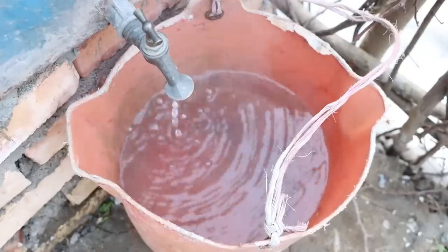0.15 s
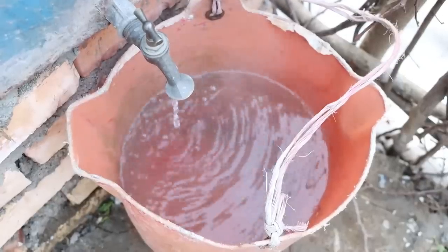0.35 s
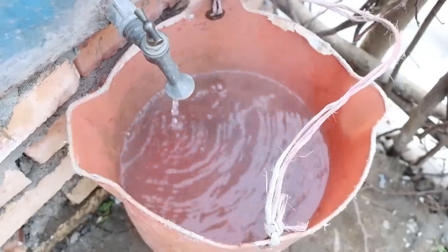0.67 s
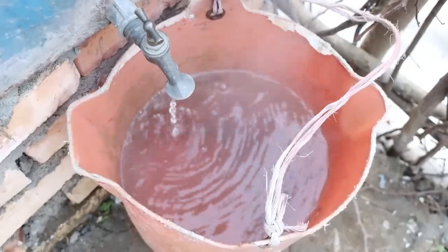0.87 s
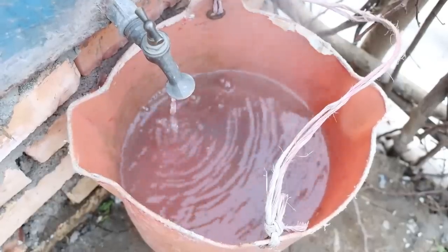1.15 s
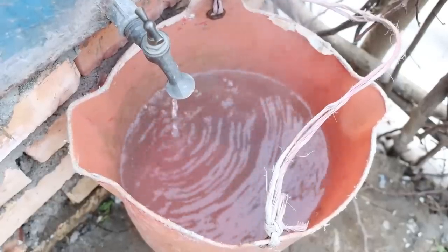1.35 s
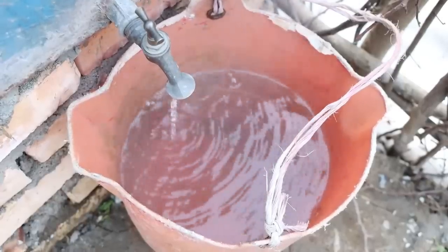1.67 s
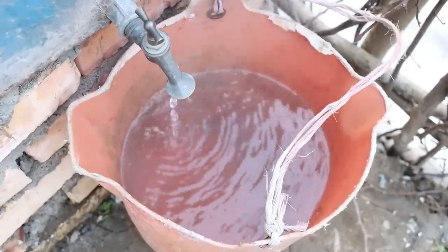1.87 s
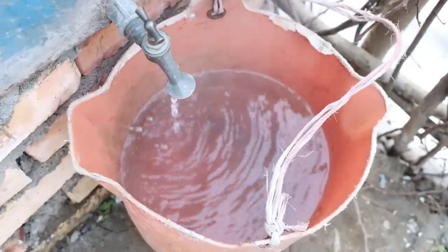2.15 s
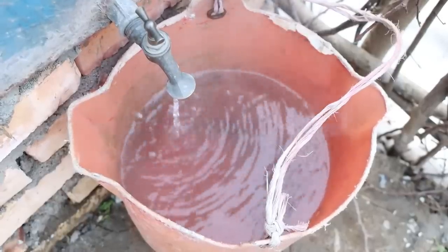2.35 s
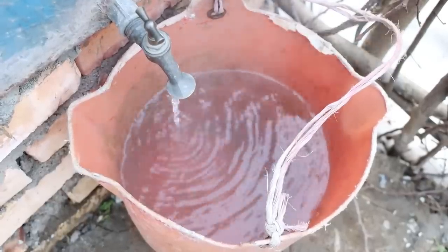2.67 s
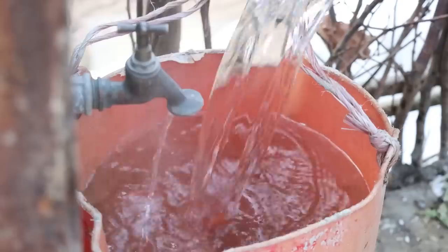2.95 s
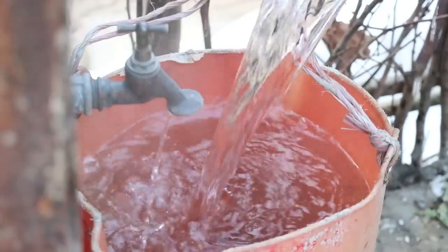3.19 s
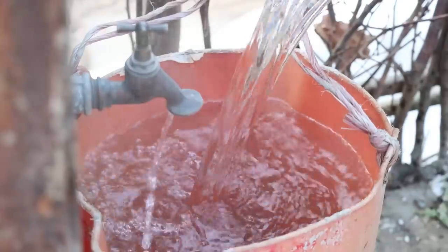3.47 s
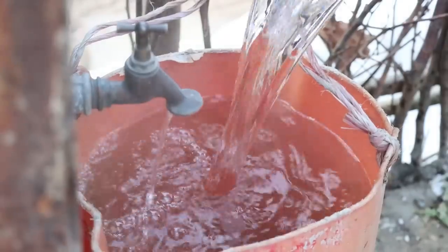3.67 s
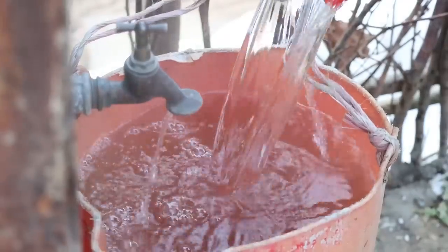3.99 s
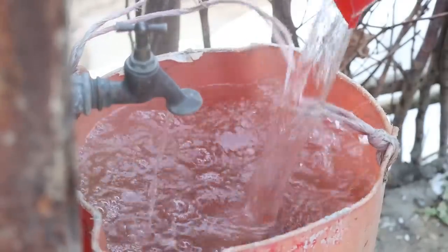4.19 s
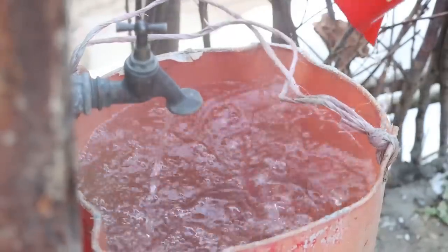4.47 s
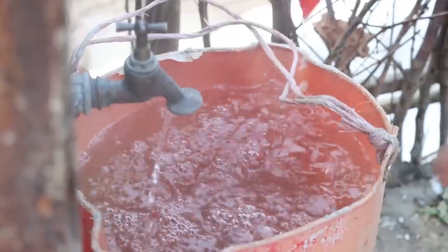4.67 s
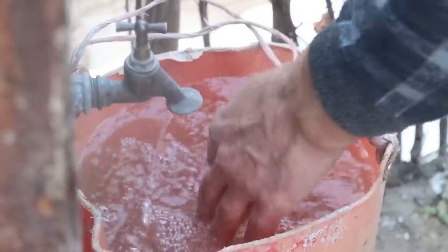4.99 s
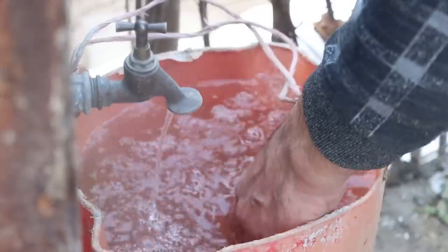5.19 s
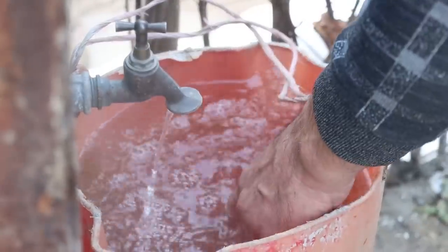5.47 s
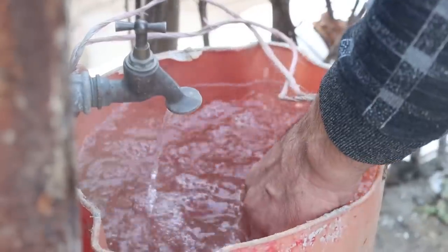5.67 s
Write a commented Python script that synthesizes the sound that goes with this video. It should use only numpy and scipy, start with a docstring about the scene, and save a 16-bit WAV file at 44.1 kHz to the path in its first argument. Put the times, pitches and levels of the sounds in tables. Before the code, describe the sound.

A broken trickle patters into a nearly full bucket in a yard, each drop a sharp tick coloured by the hollow plastic. The sound then switches abruptly to poured water, surging, easing and surging again with splashes, gurgles and fizzing droplets. It ends in soft, sparse dripping and light bubbling, as a hand moves in the water. Close stereo microphone, slightly left, very quiet low background.

```python
"""Outdoor tap: a thin stream breaks into drops that fall into a nearly full plastic bucket.
Each drop is a noise slap, coloured by the air in the bucket; trapped bubbles are short gliding sines, most rising.
From 2.79 to 4.5 s a jug is emptied in two gushes of dense small bubbles and clicking spray.
Then the trickle goes on, farther off and weaker, while a hand stirs; the yard hums behind as banded noise."""
import sys
import numpy as np
from scipy import signal
from scipy.io import wavfile

SR = 44100
rng = np.random.default_rng(int(sys.argv[2]) if len(sys.argv) > 2 else 0)


def store_pcm(level_fs):
    """Save levels as 16-bit WAV."""
    pcm = np.round(np.clip(level_fs, -1, 1) * 32767).astype(np.int16)
    wavfile.write(sys.argv[1], SR, np.atleast_2d(pcm).T)


N = 257103


def from_db(db):
    """Decibels to amplitude gain."""
    return 10 ** (np.asarray(db) / 20)


def rms_one(x):
    """Scales to rms 1."""
    return x / np.sqrt(np.mean(x ** 2) + 1e-20)


def in_time(rows):
    """Interpolates the columns of a (time, ...) table to one value a sample."""
    time_s, *columns = np.transpose(rows)
    return [np.interp(np.arange(N) / SR, time_s, column) for column in columns]


def at_hz(points, hz):
    """Reads a (frequency, value) table on a log frequency axis."""
    points_hz, values = np.array(points).T
    return np.interp(np.log(hz), np.log(points_hz + 1), values)


def drift(corner_hz):
    """Slow random curve of rms 1: noise through two equal one-pole low-passes."""
    step = 20  # samples between computed points
    pole = np.exp(-2 * np.pi * corner_hz * step / SR)
    noise = rng.standard_normal(N // step + 2002)
    slow = signal.lfilter([1], [1, -2 * pole, pole * pole], noise)[2000:]  # drop the run-in
    return np.interp(np.arange(N) / step, np.arange(len(slow)), rms_one(slow))


def resonance(x, hz, width_hz):
    """Two-pole resonance with peak gain 1."""
    r = np.exp(-np.pi * width_hz / SR)
    b = [(1 - r * r) / 2, 0, (r * r - 1) / 2]
    a = [1, -2 * r * np.cos(2 * np.pi * hz / SR), r * r]
    return signal.lfilter(b, a, x + 1e-18)


def shaped(x, peaks):
    """Chain of resonant peaks and dips."""
    for hz, width_hz, db in peaks:
        x = x + (from_db(db) - 1) * resonance(x, hz, width_hz)
    return x


def add(out, time_s, sound):
    """Mixes a short sound in at a time."""
    i = int(time_s * SR)
    out[..., i:i + sound.shape[-1]] += sound[..., :N - i]


def stereo_bands(mid, side, spectrum, flicker_db):
    """Third-octave bands, each with its own level, flicker, left-right correlation and lean."""
    # left-right correlation: (frequency [Hz], correlation [0-1])
    likeness = [(60, 1), (500, 0.75), (1200, 0.14), (2500, 0.25), (5000, 0.55), (12000, 0.087)]
    # left minus right: (frequency [Hz], level [dB])
    lean = [(60, 0.5), (1000, -0.5), (4000, 0.5), (12000, -0.5)]
    out = 0
    edges_hz = 22 * 2 ** (np.arange(30) / 3)
    for low_hz, high_hz in zip(edges_hz, edges_hz[1:]):
        hz = np.sqrt(low_hz * high_hz)
        if hz < spectrum[0][0]:
            continue
        band = signal.butter(2, [low_hz, high_hz], "band", fs=SR, output="sos")
        m, s = signal.sosfilt(band, [mid, side])
        alike = np.clip(at_hz(likeness, hz), -1, 1)
        level_db = at_hz(spectrum, hz) + flicker_db * drift(corner_hz=34.0)
        lean_db = at_hz(lean, hz) / 2 * np.array([[1], [-1]])
        stereo = np.sqrt(1 + alike) * m + np.sqrt(1 - alike) * s * [[1], [-1]]
        out = out + from_db(level_db + lean_db) * stereo
    return out


def slaps():
    """A drop hits the water: a noise crack with a decaying tail, a bright part and a part ringing the bucket air."""
    # loud drops: (time [s], relative crack [dB], relative air ring [dB], brightest [Hz])
    loud_drops = [(0.0024, -23, -28, 4600), (0.0637, -29, -26, 5120), (0.1002, -44, -35, 4500),
                  (0.1286, -15.5, -28, 4530), (0.1848, -36, -53, 7590), (0.2563, -23, -33.5, 4590),
                  (0.2754, -42, -31, 4600), (0.285, -29, -34, 6030), (0.312, -25, -53, 4600),
                  (0.338, -22.5, -31, 5000), (0.376, -22, -24, 4570), (0.3894, -16, -40, 4610),
                  (0.412, -18.5, -25, 4570), (0.4449, -23.5, -30, 5610), (0.4829, -13.5, -23, 5600),
                  (0.5084, -23, -23.5, 5560), (0.5126, -12, -19, 5900), (0.5393, -17.5, -48, 7600),
                  (0.5736, -18.5, -31, 11300), (0.61, -20, -27, 4800), (0.6371, -28, -29, 5000),
                  (0.6608, -29.5, -34, 11700), (0.6784, -34, -22.5, 11600), (0.697, -16, -23.5, 4800),
                  (0.7178, -31, -51, 10800), (0.769, -31, -35, 8960), (0.8051, -25, -27.5, 4640),
                  (0.8754, -33, -35.5, 9630), (0.8899, -25.5, -59, 7700), (0.9147, -27, -61, 11500),
                  (0.9395, -18.5, -53, 12200), (0.9554, -26, -31, 4620), (0.9842, -23.5, -24.5, 4620),
                  (1.0288, -33, -29, 11900), (1.044, -21, -30, 4600), (1.055, -20, -36, 4980),
                  (1.0761, -20.5, -33, 5500), (1.0887, -30, -35, 9090), (1.1255, -22.5, -32.5, 4610),
                  (1.1414, -31, -30, 4540), (1.1693, -29, -28, 5480), (1.2045, -42, -38, 4520),
                  (1.2306, -21, -37, 5640), (1.2615, -35, -36, 12800), (1.3017, -16.5, -23, 11700),
                  (1.3369, -36, -31, 4790), (1.349, -30, -33, 4600), (1.3733, -19, -32, 4760),
                  (1.4205, -33, -39, 12000), (1.4611, -28, -35, 7090), (1.4937, -26, -28, 4610),
                  (1.5145, -30, -36, 12000), (1.5288, -23.5, -26.5, 4660), (1.5565, -16.5, -24, 6500),
                  (1.5986, -22, -16, 4600), (1.6128, -21, -25.5, 4570), (1.6552, -30, -32, 4610),
                  (1.6761, -31, -36, 4970), (1.712, -34, -33, 5620), (1.7491, -17, -27, 4400),
                  (1.7672, -17, -28, 4240), (1.789, -29, -52, 9050), (1.8057, -39, -30, 4770),
                  (1.8182, -18.5, -24.5, 4340), (1.8515, -30.5, -37, 5610), (1.8846, -37, -33, 5520),
                  (1.92, -24, -38, 5580), (1.942, -18, -30, 11000), (1.9694, -23, -41, 5580),
                  (1.99, -21, -40, 4900), (2.0035, -16.5, -31.5, 5700), (2.0311, -21.5, -37, 5640),
                  (2.051, -28, -43, 12600), (2.0908, -20, -26.5, 4590), (2.1044, -17.5, -30, 4560),
                  (2.1266, -30, -41, 4870), (2.1727, -18, -38, 11600), (2.197, -26, -26, 4540),
                  (2.2136, -40, -40, 4520), (2.2404, -16.5, -36, 5760), (2.3022, -12.5, -34, 5800),
                  (2.3337, -31, -31, 4620), (2.3594, -17, -38, 7040), (2.4024, -40, -30.5, 4760),
                  (2.4165, -31, -37, 11600), (2.4343, -27.5, -27, 8960), (2.4558, -23, -27.5, 5630),
                  (2.5004, -19, -34.5, 6070), (2.5336, -8, -27, 4500), (2.5745, -16.5, -30.5, 11700),
                  (2.6045, -33, -39, 5270), (2.6284, -9, -19.5, 4700), (2.6695, -28, -34.5, 6790),
                  (2.703, -23.5, -27, 5560), (2.7284, -34, -30, 4720), (2.754, -21, -23, 4660),
                  (2.7758, -42, -39, 6980), (2.7937, -10.5, -26, 6950), (2.8087, -10, -25, 4630),
                  (2.836, -13, -41, 5050), (2.8483, -17.5, -40, 12600), (2.873, -24, -40, 5570),
                  (2.9221, -16.5, -21.5, 6690), (2.9865, -10.5, -22.5, 4520), (3.0334, -24, -27, 4600),
                  (3.052, -15, -26, 5040), (3.075, -34, -25, 6720), (3.1503, -10, -27, 4600),
                  (3.173, -25, -25, 4570), (3.1952, -33, -23, 4500), (3.2127, -24, -30, 6430),
                  (3.268, -16.5, -42, 7600), (3.2814, -33, -26.5, 4610), (3.292, -25, -33, 11600),
                  (3.3122, -22.5, -26, 5630), (3.3514, -28, -29, 5850), (3.3972, -28, -19, 4540),
                  (3.486, -23, -26.5, 4670), (3.502, -21.5, -28, 4970), (3.5668, -15.5, -29, 4500),
                  (3.6539, -28, -25.5, 4560), (3.7277, -16.5, -37.5, 5460), (3.7725, -37, -43, 5870),
                  (3.7954, -20, -28, 6660), (3.8516, -31, -33, 6340), (3.865, -26, -27.5, 4950),
                  (3.8836, -31, -47, 7350), (3.913, -25, -40, 7050), (3.9585, -11.5, -25.5, 5470),
                  (3.979, -21, -30, 9670), (4.018, -31, -31, 6780), (4.0667, -14.5, -52, 4500),
                  (4.0976, -22, -39, 4780), (4.121, -13.5, -28, 4640), (4.1505, -34, -36, 5480),
                  (4.1771, -18.5, -25.5, 6500), (4.2106, -14.5, -33, 6940), (4.288, -23, -36.5, 6770),
                  (4.3288, -8, -30, 4750), (4.359, -13, -36, 6400), (4.3805, -14.5, -26, 6960),
                  (4.4135, -19, -27, 4570), (4.436, -30, -22.5, 4570), (4.446, -14, -22.5, 4500),
                  (4.4835, -20, -43, 5460), (4.5016, -22, -42, 5600), (4.5503, -26.5, -49, 5450),
                  (4.6206, -30.5, -38, 11600), (4.6612, -30, -34, 4660), (4.7216, -23.5, -35, 7400),
                  (4.7646, -18, -43, 5300), (4.8738, -21.5, -38, 8900), (4.884, -21.5, -37, 11600),
                  (5.1163, -29, -38, 6590), (5.1612, -23, -35.5, 4790), (5.1838, -29, -49, 4800),
                  (5.206, -30, -38, 4670), (5.2818, -27.5, -33.5, 6900), (5.3477, -25, -34, 12400),
                  (5.3974, -31, -37.5, 6130), (5.4261, -27, -37, 11600), (5.4715, -28, -60, 7700),
                  (5.5213, -31, -56, 12300), (5.6196, -40, -42, 4530), (5.6444, -26.5, -41, 6700),
                  (5.752, -28.5, -59, 4630), (5.8107, -28, -36, 4650)]
    # resonances of the air in the bucket: (centre [Hz], width [Hz], relative level [dB])
    air_modes = [(477, 46.5, -7), (776, 140, -5.5), (1104, 186, 0), (1860, 500, -8.5), (2636, 488, -4),
                 (4710, 360, -11.5)]
    t = np.arange(int(.04 * SR)) / SR
    attack_s, crack_decay_s = 0.00035, 0.00034
    tail = from_db(-9 - 60 * t / 0.03)
    shape = np.minimum(t / attack_s, 1) * (np.exp(-t / crack_decay_s) + tail)

    body, bright = np.zeros(N), np.zeros((2, N))
    drops = np.vstack([loud_drops, drips()])
    noises = rng.standard_normal((len(drops), 3, len(t)))
    for (time_s, crack_db, ring_db, hz), noise in zip(drops, noises):
        add(body, time_s, from_db(ring_db) * shape * noise[0])
        burst = from_db(crack_db) * shape * noise[1:]
        add(bright, time_s, 0.24 * burst + resonance(burst, hz, width_hz=0.41 * hz))

    air = np.zeros(N)
    for k, (hz, width_hz, db) in enumerate(air_modes):
        air += (-1) ** k * from_db(db) * resonance(body, hz, width_hz)  # alternating polarity
    high_pass = signal.butter(2, 4500, "high", fs=SR, output="sos")
    mid, side = signal.sosfilt(high_pass, bright)
    crack = (mid + 0.72 * side * [[1], [-1]]) * from_db([[1.8], [-1.8]])
    # make-up gains: the resonances and the high-pass let through only part of each burst
    return from_db(24) * air + from_db(2.5) * crack


def drips():
    """Small drops at random moments, in rows like the loud ones; weaker after the move away."""
    drips_per_s, move_s = 16, 2.79
    near_db, far_db, ring_re_crack_db = -37, -41, -8
    spread_db = 2.5  # per e-fold of the random size
    lowest_hz, range_octaves = 4600, 1.5  # colour, mostly low in this range
    when, size, colour = rng.random((int(drips_per_s * N / SR), 3)).T
    time_s = when * N / SR
    crack_db = np.where(time_s < move_s, near_db, far_db) - spread_db * np.log(size + 0.04)
    brightest_hz = lowest_hz * 2 ** (range_octaves * colour ** 3)
    return np.transpose([time_s, crack_db, crack_db + ring_re_crack_db, brightest_hz])


def bubble(peak_db, first_hz, last_hz, swell_ms, fade_ms):
    """A trapped bubble: a sine that swells and dies; it glides, and hooks upward as the cavity closes."""
    t_ms = np.arange(int((swell_ms + 1.8 * fade_ms) * SR / 1000)) * 1000 / SR
    age = t_ms / (swell_ms + fade_ms)
    late = np.maximum(age - 1, 0)
    glide_hz = (last_hz - first_hz) * np.minimum(age, 1) ** 1.5
    hz = first_hz + glide_hz + 1300 * late ** 2
    swell_db = -7 * np.maximum(1 - t_ms / swell_ms, 0)
    fade_db = -13 * (np.maximum(t_ms - swell_ms, 0) / fade_ms) ** 0.73
    onset = np.minimum(t_ms / 0.59, 1)
    return from_db(peak_db + swell_db + fade_db) * onset * np.sin(2 * np.pi * np.cumsum(hz) / SR)


def bubbles():
    """Loud bubbles: quick to peak, but slower if they end near the strongest pitch of the bucket air."""
    # loud bubbles: (time [s], relative peak [dB], first [Hz], last [Hz], length [ms])
    loud_bubbles = [(.003, -11.5, 1240, 1090, 4), (.063, -20, 1640, 1450, 8.9), (.065, -25, 764, 830, 13),
                    (.103, -19, 570, 592, 22), (.136, -18, 580, 904, 21), (.177, -29.5, 1200, 1340, 7),
                    (.216, -31, 590, 890, 26), (.277, -17.5, 1330, 1590, 7.4), (.322, -25, 980, 1360, 7),
                    (.34, -10.5, 1050, 1140, 6.1), (.376, -8, 1002, 1200, 12), (.413, -13, 1190, 1520, 4.3),
                    (.449, -14.5, 1050, 1250, 8.6), (0.484, -21.5, 2950, 3120, 7.3),
                    (.484, -25, 774, 950, 8.7), (.485, -16, 1360, 1670, 7.3), (.513, -18.5, 1670, 1730, 3),
                    (.552, -27.5, 1050, 1230, 10.3), (.576, -18.5, 1010, 1250, 11),
                    (.577, -22.5, 1750, 1770, 15), (.585, -21, 695, 760, 9.5), (.591, -21.5, 2350, 2480, 6),
                    (.61, -18, 1210, 1075, 7.1), (.635, -26, 1230, 1130, 4.6), (.679, -20, 730, 836, 7),
                    (0.686, -23.5, 1360, 1340, 9.9), (.712, -24.5, 970, 1250, 7.1),
                    (.764, -18.5, 653, 860, 12.6), (.782, -24, 1130, 1820, 11),
                    (.809, -19, 1660, 1780, 2.6), (.875, -22, 726, 660, 21), (.942, -21, 593, 860, 4.7),
                    (.955, -18.5, 1110, 1180, 7.1), (.957, -15, 674, 863, 14),
                    (.996, -16.5, 1030, 1170, 5.8), (1.041, -16.5, 1074, 1750, 9.4),
                    (1.056, -25, 690, 730, 12.6), (1.091, -27.5, 2180, 2400, 7), (1.142, -16, 1180, 750, 8),
                    (1.168, -18, 2790, 3040, 6.4), (1.18, -16.5, 686, 820, 11),
                    (1.187, -11, 860, 1360, 5.4), (1.21, -9.5, 910, 1400, 5.5),
                    (1.262, -16.5, 1110, 1050, 12), (1.302, -12, 1070, 790, 11),
                    (1.32, -22, 1410, 2120, 4.7), (1.339, -19.5, 1170, 1000, 10.3),
                    (1.383, -15.5, 1110, 706, 4.4), (1.422, -20, 622, 830, 23),
                    (1.457, -24.5, 1660, 1800, 7.5), (1.474, -23, 760, 1080, 9.1),
                    (1.491, -23, 1070, 1840, 11), (1.53, -32, 720, 865, 17), (1.553, -15, 1140, 1085, 17.5),
                    (1.567, -16.5, 757, 884, 13), (1.577, -13, 975, 1050, 11.6),
                    (1.597, -8.5, 2870, 3000, 2.3), (1.613, -14, 830, 834, 10.8),
                    (1.656, -16.5, 1040, 760, 11.7), (1.711, -19.5, 1150, 1070, 5.1),
                    (1.712, -17.5, 683, 726, 23), (1.79, -15, 640, 1190, 14), (1.818, -18, 460, 530, 4.2),
                    (1.82, -6, 815, 935, 4.1), (1.825, -6.5, 1033, 1230, 11.3),
                    (1.861, -23, 970, 1290, 5.6), (1.923, -16, 1070, 1690, 6.9),
                    (1.942, -15.5, 2790, 3500, 6.3), (1.893, -34.5, 640, 670, 48),
                    (1.943, -23.5, 645, 737, 25.5), (1.997, -19.5, 1176, 900, 13.8),
                    (2.032, -21.5, 1040, 1360, 8), (2.048, -16.5, 604, 840, 18.2),
                    (2.097, -28, 793, 780, 13), (2.106, -15, 2930, 3440, 5.2), (2.153, -25, 990, 1620, 13),
                    (2.18, -22.5, 1010, 1230, 11), (2.203, -24, 690, 780, 19),
                    (2.24, -13.5, 1116, 1120, 10), (2.253, -20.5, 664, 706, 15),
                    (2.311, -22, 690, 1187, 19), (2.343, -14.5, 950, 1430, 15),
                    (2.347, -17, 1420, 1680, 5.8), (2.361, -27, 1790, 1690, 17),
                    (2.402, -17.5, 1120, 1143, 7.5), (2.436, -20.5, 1070, 1300, 7.2),
                    (2.457, -12.5, 1124, 1190, 7.2), (2.51, -25.5, 710, 706, 14.4),
                    (2.534, -21.5, 657, 937, 25.5), (2.629, -12, 1086, 994, 9.5),
                    (2.63, -22, 2430, 2520, 8), (2.635, -25, 645, 790, 18), (2.672, -8, 1015, 1217, 6.1),
                    (2.726, -26, 658, 848, 27), (2.756, -23.5, 1150, 1210, 8), (2.8, -14, 490, 490, 4.3),
                    (2.802, -34, 225, 280, 40), (2.832, -22, 2390, 2500, 6), (2.9, -14, 1140, 1590, 3.1),
                    (3.053, -22, 5070, 5090, 8.1), (3.109, -20.5, 2100, 2310, 6),
                    (3.144, -17, 2180, 2260, 16.5), (3.197, -22.5, 3420, 3120, 15),
                    (3.222, -21, 3540, 3600, 6.6), (3.235, -26.5, 800, 1050, 17),
                    (3.283, -20.5, 3320, 3370, 9), (3.313, -21, 653, 687, 8.6),
                    (3.328, -17, 1100, 1210, 17), (3.397, -13, 2370, 2440, 10),
                    (3.424, -20, 2040, 2370, 10), (3.484, -28, 1064, 1240, 16), (3.568, -14, 1510, 1700, 6),
                    (3.636, -21.5, 1230, 1610, 5.9), (3.864, -23.5, 1330, 900, 7.2),
                    (3.958, -10, 5270, 5940, 1.7), (3.96, -15.5, 3420, 3570, 3.8),
                    (3.96, -25, 880, 900, 16), (4.067, -18, 4150, 3680, 4.7), (4.135, -25, 790, 784, 14),
                    (4.15, -5, 2540, 2550, 6), (4.152, -15, 2050, 1950, 13), (4.358, -20, 762, 764, 25),
                    (4.435, -20, 1964, 1960, 12), (4.438, -21.5, 1584, 1064, 10.8),
                    (4.504, -26, 4300, 4050, 6.1), (4.661, -35.5, 1480, 1590, 18),
                    (4.698, -33, 1480, 1720, 14), (4.766, -32, 1250, 1500, 5.5),
                    (4.838, -30.5, 1570, 1320, 10), (4.873, -33.5, 1166, 1520, 12),
                    (4.988, -34.5, 630, 720, 15), (5.023, -29.5, 605, 654, 20),
                    (5.107, -25.5, 1480, 1760, 10), (5.129, -29.5, 1180, 1620, 13),
                    (5.184, -32.5, 800, 790, 17), (5.184, -27, 4170, 5040, 6), (5.28, -29.5, 834, 780, 8.2),
                    (5.328, -29.5, 1200, 1050, 11), (5.349, -29, 2900, 3340, 8.4),
                    (5.398, -19, 1390, 1170, 4.2), (5.453, -31.5, 1420, 1320, 3.5),
                    (5.587, -31, 1020, 1360, 13), (5.615, -26, 1350, 1450, 6.4),
                    (5.811, -26, 1330, 1100, 3.8), (5.812, -23.5, 664, 674, 11.5)]
    base_swell_ms, tuned_extra_ms = 1.07, 3.36
    tuned_hz, tuned_octaves = 1272, 0.24
    out = np.zeros(N)
    for time_s, peak_db, first_hz, last_hz, length_ms in loud_bubbles:
        tuned = np.exp(-(np.log2(last_hz / tuned_hz) / tuned_octaves) ** 2)
        swell_ms = np.clip(base_swell_ms + tuned_extra_ms * tuned, .3, 0.64 * length_ms)
        add(out, time_s, bubble(peak_db, first_hz, last_hz, swell_ms, length_ms - swell_ms))
    return out


def gurgle(gurgle_db, chances_per_s):
    """Small rising bubbles of a few cycles, over some three octaves (smaller is higher); dense under the jug."""
    # small bubbles: (time [s], pitch of the biggest [Hz], share of chances born [0-1])
    small_bubbles = [(0, 662, .24), (2.77, 648, 0.29), (2.8, 432, 0.7), (2.88, 557, 1), (3.5, 623, 0.61),
                     (4.05, 626, .54), (4.3, 756, 1), (4.5, 763, .57), (4.6, 787, 0.28), (5.83, 806, 0.42)]
    out = np.zeros(N)
    biggest_hz, share = in_time(small_bubbles)
    for when, pitch, weakness, life, lot in rng.random((int(chances_per_s * N / SR), 5)):
        i = int(when * N)
        if lot < share[i]:
            hz = biggest_hz[i] * 9.0 ** (pitch ** 1.2)
            last_hz = hz * (1.02 + .12 * life)
            fade_ms = 1000 * (3 + 7 * life) / hz  # 3 to 10 cycles
            # many small ones add up as a few big ones
            peak_db = -16 * weakness - 7 * pitch - 10 * np.log10(share[i])
            add(out, i / SR, bubble(peak_db, hz, last_hz, swell_ms=1.2, fade_ms=fade_ms))
    return from_db(gurgle_db + 3 * drift(corner_hz=14)) * rms_one(out)


def spray(spray_db, clicks_per_s):
    """Fine droplets: clumped random clicks of uneven size on a little hiss."""
    # spectrum: (frequency [Hz], relative density [dB])
    spray_spectrum = [(1000, -50), (1500, -5), (2200, 11), (3300, 6), (5000, 1.5), (8000, -3), (12000, -6),
                      (16500, -16.5)]
    clumping = from_db(4 * drift(corner_hz=30))
    born = rng.random((2, N)) < clicks_per_s * clumping / SR
    size = from_db(2.93 * np.minimum(rng.exponential(1, (2, N)), 5))
    clicks = born * size * rng.standard_normal((2, N))
    mid, side = rms_one(clicks) + .5 * rng.standard_normal((2, N))
    return from_db(spray_db) * rms_one(stereo_bands(mid, side, spray_spectrum, flicker_db=2.0))


def walls(x):
    """Reflections: a few low-passed echoes, each slightly later on one side."""
    # bucket wall and brick wall: (delay [s], level [dB])
    echo_taps = [(.0021, -22), (.0047, -13.5), (.011, -18.5), (.019, -33)]
    side_lag_s = 0.00015
    out = np.zeros((2, N))
    dull = signal.lfilter([.4], [1, -.6], x)
    for k, (delay_s, db) in enumerate(echo_taps):
        first, later = k % 2, 1 - k % 2
        add(out[first], delay_s, from_db(db) * dull[first])
        add(out[later], delay_s + side_lag_s, from_db(db) * dull[later])
    return out


def yard():
    """Far hum of the yard: steady stereo noise, mostly low, with a slight flicker in each band."""
    # spectrum: (frequency [Hz], relative density [dB])
    yard_spectrum = [(20, -34), (40, -20), (60, -3.5), (110, -1.5), (150, 0.5), (200, -2), (400, -2.5),
                     (1000, -4), (2500, -23), (7000, -19.5), (16500, -22.5)]
    yard_rms_db = -51.5
    mid, side = rng.standard_normal((2, N))
    return from_db(yard_rms_db) * rms_one(stereo_bands(mid, side, yard_spectrum, flicker_db=1.2))


def scene():
    """Water near the microphone, its echoes, and the far hum of the yard."""
    # churned water between the slaps: (time [s], relative gurgle [dB], relative spray [dB])
    churn = [(0, -42.5, -39.5), (.3, -47, -74), (.55, -46, -49), (1.2, -44, -66.5), (2.77, -50, -50.5),
             (2.8, -40, -27), (2.93, -34, -33.5), (3.03, -44, -36), (3.15, -40, -34), (3.3, -44, -36),
             (3.43, -34, -34), (3.52, -44.5, -44.5), (3.7, -49.5, -43), (3.85, -50, -42),
             (4.02, -40, -44.5), (4.12, -46.5, -32.5), (4.25, -35, -32.5), (4.36, -38.5, -27.5),
             (4.41, -34.5, -40.5), (4.46, -36, -36), (4.53, -50.5, -51), (5.05, -52.5, -48.5),
             (5.2, -45.5, -50), (5.83, -50, -57)]
    # direct sound and wall echo cancel: (centre [Hz], width [Hz], gain [dB])
    rim_dips = [(904, 218, -7), (2632, 250, -38)]
    # left minus right of the water: (time [s], level [dB])
    bucket_side = [(0, -1.5), (2.77, -1.5), (2.8, -3), (5.83, -4.5)]
    gurgle_db, spray_db = in_time(churn)
    pan_db, = in_time(bucket_side)
    water = slaps() + bubbles() + gurgle(gurgle_db, chances_per_s=1500)
    water = water + spray(spray_db, clicks_per_s=2000)
    water = shaped(water, rim_dips) * from_db([pan_db / 2, -pan_db / 2])
    # drops and bubbles are too small to radiate bass
    water = signal.sosfilt(signal.butter(3, 300, "high", fs=SR, output="sos"), water)
    return water + walls(water) + yard()


def record(dry):
    """Microphone: colours the treble, fades above 14 kHz and cuts the top."""
    # treble response: (centre [Hz], width [Hz], gain [dB])
    treble_peaks = [(10570, 2100, -7), (11360, 1100, 6.5)]
    stopband_hz, stopband_db = 17000, 70
    fade = signal.butter(6, 14600, fs=SR, output="sos")
    soft = signal.sosfilt(fade, shaped(dry, treble_peaks))
    return signal.sosfilt(signal.cheby2(12, stopband_db, stopband_hz, fs=SR, output="sos"), soft)


dry = scene()
out = record(dry)
store_pcm(out)
```